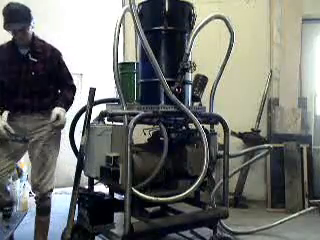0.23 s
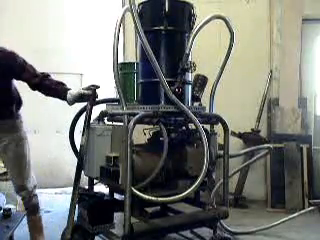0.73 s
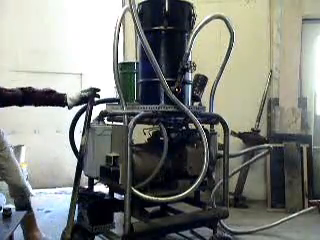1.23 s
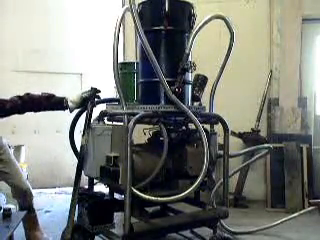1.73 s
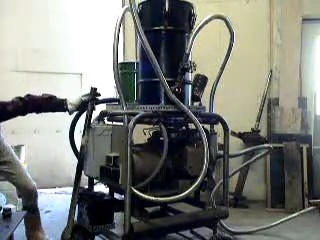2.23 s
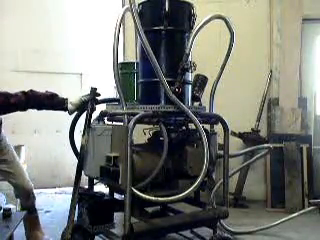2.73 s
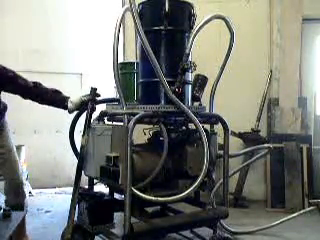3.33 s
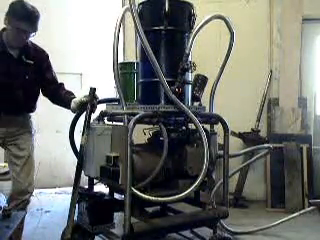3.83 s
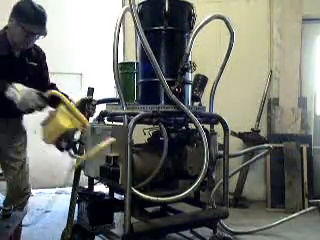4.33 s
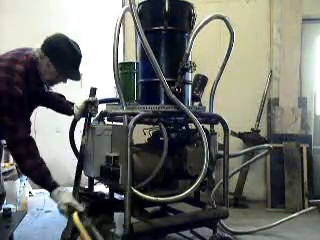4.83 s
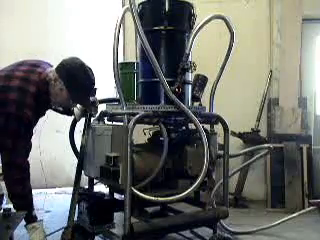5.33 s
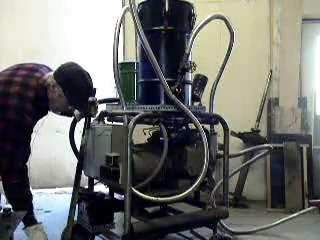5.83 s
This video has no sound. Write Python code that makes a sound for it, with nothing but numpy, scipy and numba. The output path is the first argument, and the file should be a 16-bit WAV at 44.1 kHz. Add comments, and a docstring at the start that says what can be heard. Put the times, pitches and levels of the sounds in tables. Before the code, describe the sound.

Close, dull camera sound with little treble: continuous engine drone and breathy roar, nearly constant in speed, its tones fluttering with the shed's echoes. Low wind gusts thump the microphone early, with one sharp pop and a heavy buffet. Later, light ticks lead to a loud short knock of a lamp housing, followed by scattered duller knocks, the motor still running to the end.

```python
"""Open shed: a small generator engine runs steadily a few metres from a cheap camera.
Wind: band-passed noise and single buffets. Lamp: knocks ring damped modes. Roar: noise bands
throbbing with the shaft. Hum: sines at shaft orders; order 60, a toothed part, whines.
The camera limits peaks, cuts the treble and leaves faint mirrored highs."""
import sys
import numpy as np
from scipy import signal
from scipy.fft import rfft, irfft
from scipy.io import wavfile
from scipy.ndimage import uniform_filter1d, map_coordinates
from numba import njit

SR = 44100
rng = np.random.default_rng(int(sys.argv[2]) if len(sys.argv) > 2 else 0)


def master_out(mix):
    """Clip the mix to full scale and print it as 16-bit PCM to the path in sys.argv[1]."""
    frames = np.transpose(np.atleast_2d(mix))
    ceiling = np.clip(frames, -1, 1)
    pcm = np.round(ceiling * 32767).astype(np.int16)
    wavfile.write(sys.argv[1], SR, pcm)


N = 267687
T = np.arange(N) / SR


def undb(db):
    """Decibels to amplitude gain."""
    return 10 ** (np.asarray(db) / 20)


def curves(table, t=T):
    """Table columns over time, joined by straight lines."""
    time_s, *columns = np.transpose(table)
    return [np.interp(t, time_s, column) for column in columns]


def walk(rate_hz, t=T):
    """Slow random drift, spread near 1; two knots per cycle of rate_hz."""
    white = rng.standard_normal(int(20 * rate_hz) + 8)
    knots = uniform_filter1d(white, size=2) * 1.7
    return np.interp(t * rate_hz * 2, np.arange(len(knots)), knots)


BREEZE_DB = -39  # steady floor under the gusts
# gusts on the microphone: (time [s], level at the height [dB], 1/e half-width [s])
GUSTS = [(.1, -28, 0.11), (0.246, -24, .07), (.52, -18.5, 0.063), (.9, -21, .1), (1.054, -38, .03),
         (1.18, -22, 0.035), (1.39, -7.5, 0.033), (1.6, -24, .05), (1.712, -18, 0.025),
         (1.788, -20.5, 0.045), (2.04, -27, 0.031), (2.19, -36, 0.05), (2.65, -22.5, 0.058),
         (2.946, -37, 0.11), (3.323, -26, 0.1), (3.69, -28, 0.053), (3.87, -28, .04), (4.296, -15, 0.057),
         (4.47, -23, 0.11), (5.455, -20.5, .04), (5.885, -24.5, 0.054)]
# single buffets: (time [s], peak [dB], 1/e half-width [s], push +1 or pull -1)
BUFFETS = [(.119, -10, .0022, -1), (.254, -10, .0013, -1), (.2595, -6, .0013, 1), (.309, 1, .001, 1),
           (.86, -15, .004, 1), (1.383, -12, .004, 1), (1.42, -7, .0025, -1), (1.426, -7, .0025, 1),
           (1.70, -13, .003, -1), (1.713, -13, .003, 1), (1.72, -10, .0015, -1), (1.785, -6, .0014, 1),
           (2.645, -14, .005, 1), (4.28, -14, .006, 1)]


def wind(low_hz=5.7, high_hz=69.0, flutter_db=-0.5, rebound=2.9):
    """Moving air rumbles at the microphone; sharp buffets push or pull its membrane."""
    band = signal.butter(2, [low_hz, high_hz], "band", fs=SR, output="sos")
    rumble = signal.sosfilt(band, rng.standard_normal(N))
    air = undb(BREEZE_DB)
    for time_s, db, width_s in GUSTS:
        air = air + undb(db) * np.exp(-((T - time_s) / width_s) ** 2)
    out = rumble / rumble.std() * air * undb(flutter_db * walk(24))
    for time_s, peak_db, width_s, sign in BUFFETS:
        u = (T - time_s) / width_s
        # spike on a wider opposite swing: the membrane returns to rest
        spike = np.exp(-u ** 2)
        swing_back = np.exp(-(u / rebound) ** 2) / rebound
        unit_peak = (spike - swing_back) * rebound / (rebound - 1)
        out = out + sign * undb(peak_db) * unit_peak
    return out


# lamp knocks: (time [s], peak [dB], lightness [0-1]); at 1 only the top mode rings
KNOCKS = [(4.359, -16, 1), (4.421, -12, 1), (4.484, -11, 1), (4.546, 3, 0), (4.606, -8, 0), (4.703, -7, 0),
          (4.865, -9, 0), (4.997, -8, 0), (5.396, -5, 0), (5.566, -9, 0)]
# housing modes: (frequency [Hz], level [dB], 60 dB decay time [s])
LAMP_MODES = [(750, 0, .03), (1150, 0, .03), (1700, -4, .02), (3350, -6, .025)]


def lamp():
    """Each knock rings the work lamp housing's damped modes, slightly detuned."""
    out, t = np.zeros(N), T[:SR // 10]
    detunes = rng.standard_normal((len(KNOCKS), len(LAMP_MODES)))
    for (time_s, peak_db, lightness), detune in zip(KNOCKS, detunes):
        rings = []
        for (hz, mode_db, t60_s), d in zip(LAMP_MODES, detune):
            tone = np.sin(2 * np.pi * hz * (1 + 0.022 * d) * t)
            rings.append(undb(mode_db) * tone * 1000 ** (-t / t60_s))
        ring = rings[-1] + (1 - lightness) * sum(rings[:-1])
        start = int(time_s * SR)
        out[start:start + len(t)] += undb(peak_db) * ring / np.abs(ring).max()
    return out


TEETH = 60
# shaft speed as tooth rate: (time [s], teeth passing per second [Hz])
TOOTH_RATE = [(0.0, 1883.0), (0.7, 1889.5), (1.0, 1882.0), (1.25, 1886.0), (1.6, 1881.5), (2.25, 1889.0),
              (2.5, 1885.5), (3.0, 1888.5), (3.5, 1896.0), (3.8, 1893.0), (4.75, 1894.0), (5.5, 1901.5),
              (5.75, 1898.5), (6.0, 1892.5)]


def shaft_angle():
    """Shaft angle [rad]: running sum of the turning rate."""
    return 2 * np.pi * np.cumsum(curves(TOOTH_RATE)[0]) / TEETH / SR


# base spectrum of exhaust, fan and casing: (frequency [Hz], density [dB per Hz])
ROAR = [(30, -69), (90, -61.5), (160, -59.5), (250, -51), (400, -50.5), (580, -48), (800, -48.5),
        (1100, -51.5), (1500, -52), (1900, -52.5), (2150, -56), (3000, -59.5), (3800, -60), (4600, -61.5)]


def roar_db(hz):
    """Base roar density at hz, straight lines over log frequency."""
    table_hz, density_db = np.transpose(ROAR)
    return np.interp(np.log(hz), np.log(table_hz), density_db)


# roar level by band centre: (time [s], boom < 300 Hz [dB], middle [dB], hiss >= 1200 Hz [dB])
LOAD = [(0, -3, 0, -3), (.6, 4.5, 3.2, -1.2), (1, 0.5, 0, -0.5), (1.5, 0.3, 0.8, -1), (3, -4.5, -3, -3),
        (4.3, -0.3, 0, -1.7), (5, 5.5, 2.5, 2), (6.07, 7.5, 4.6, 2.4)]


def roar(angle, swell_db=0.5, flicker_db=1.0, throb=0.18, low_throb=.04):
    """Noise bands half an octave apart, pulsed by firing and fan, most in the treble."""
    hz = np.fft.rfftfreq(N + 1, 1 / SR) + 1  # +1 keeps log(hz) finite
    boom_db, middle_db, hiss_db = curves(LOAD)
    beat = 0.41 * np.cos(angle / 2) + 0.68 * np.cos(angle + 1) + 0.66 * np.cos(2 * angle)
    beat = beat + 0.54 * np.cos(3 * angle) + .5 * np.cos(4 * angle + 2)
    swell, out = walk(9), 0
    for centre_hz in 32 * 2 ** np.arange(0, 7.6, .5):
        # neighbouring shares add to constant power
        share = np.cos(np.pi * np.clip(np.log2(hz / centre_hz), -.5, .5))
        spectrum = rfft(rng.standard_normal(N + 1)) * share * undb(roar_db(hz))
        band = irfft(spectrum, N + 1)[:N] * np.sqrt(SR / 2)
        depth = low_throb + throb * (centre_hz / 4000) ** 1.5
        load_db = boom_db if centre_hz < 300 else middle_db if centre_hz < 1200 else hiss_db
        db = load_db + swell_db * swell + flicker_db * walk(14)
        out = out + band * undb(db) * (1 + depth * beat)
    return out


# prominent orders [multiples of shaft rate]
CLEAR_ORDERS = [2, 4, 5.5, 8, 10, 11.5, 13, 16, 17, 18, 19, 28, 30, 32, 40, 44, 48, 52, 53, 56, 59, 61]
# usual levels of those orders [dB]
CLEAR_DB = [-40, -46, -41, -38, -36.5, -34.5, -37.5, -31.5, -34, -28, -29.5, -30.5, -33.5, -31.5, -39.5,
            -36.5, -36, -35.5, -39, -36.5, -33.5, -35.5]
# other orders, dB over roar density: every fourth, even, odd, half
FOURTH_DB, EVEN_DB, ODD_DB, HALF_DB = 5.5, 9, 9, 8.5
# strongest hum lines: (time [s], order 12 [dB], order 20 [dB], order 24 [dB])
DRONE = [(0, -28.5, -24, -23.5), (.45, -25.5, -21.5, -30), (.85, -23, -18.5, -46), (1.1, -22.5, -30.5, -22),
         (1.6, -29, -21, -33), (2.05, -29.5, -24.5, -31), (2.3, -33, -18.5, -35), (2.8, -29, -24, -36),
         (3.05, -25, -22, -27), (3.35, -32, -28, -22), (3.6, -24.5, -22.5, -26), (3.9, -26.5, -19.5, -32),
         (4.4, -25.5, -19, -26), (4.68, -24.5, -31, -21.5), (5.1, -23, -22.5, -28.5),
         (6.07, -20.5, -28, -24)]
# whine at the tooth rate: (time [s], level [dB])
WHINE = [(0, -31), (.4, -23), (.46, -34), (.53, -15.5), (.68, -15), (.84, -26.5), (.98, -10.5), (1.06, -30),
         (1.12, -14.5), (1.28, -33), (1.4, -20.5), (1.5, -18.5), (1.6, -33), (1.74, -34), (1.84, -20.5),
         (2.21, -20), (2.3, -30), (2.64, -31.5), (2.75, -20), (2.9, -25.5), (3.2, -40), (3.32, -18),
         (3.52, -19), (3.6, -23.5), (4.24, -32), (4.33, -20), (4.53, -16.5), (4.58, -33), (4.75, -20.5),
         (5.05, -29), (5.2, -20.5), (5.95, -21), (6.07, -33)]
# octave of the whine: (time [s], level [dB])
OCTAVE = [(0, -50), (.95, -46), (1.12, -31), (1.4, -41), (2.15, -31.5), (2.45, -36), (3.1, -33.5),
          (3.7, -34), (3.97, -50), (4.3, -38), (4.8, -37), (5.0, -34.5), (5.3, -35), (6.07, -35)]
# common swell of orders 28, 30, 32, about 900-1000 Hz: (time [s], over usual level [dB])
UPPER = [(0, -2), (.5, 3), (1.0, 0), (1.35, -8), (1.6, 3.5), (2.05, -1.5), (2.5, 4), (2.95, 2), (3.3, -5),
         (3.65, -3), (3.9, 3), (4.4, -1.5), (5.05, 2), (5.6, -5), (5.9, 5), (6.07, 2)]
DRONE_FADE_DB, WHINE_FADE_DB, OCTAVE_FADE_DB = 1.7, 1, 3  # random fade spread


def hum(angle, fade_db=3.5, fade_rate_hz=9., waver_rad=0.39, waver_rad_per_order=0.0058):
    """Sines at multiples of the shaft rate; each fades and wavers alone as the shed's echoes shift."""
    t, angle = T[::4], angle[::4]  # quarter rate suffices for these orders
    steady_db = dict(zip(CLEAR_ORDERS, CLEAR_DB))
    led_curves = curves(DRONE, t) + curves(WHINE, t) + curves(OCTAVE, t)
    led_db = dict(zip([12, 20, 24, TEETH, 2 * TEETH], led_curves))
    upper_db = curves(UPPER, t)[0]
    led_db.update({order: steady_db[order] + upper_db for order in (28, 30, 32)})
    start_hz = TOOTH_RATE[0][1] / TEETH
    out = 0
    for order in [*np.arange(2, 40, .5), *range(40, 125)]:
        fade = walk(fade_rate_hz, t)
        if order in led_db:
            spread_db = (DRONE_FADE_DB if order < TEETH
                         else WHINE_FADE_DB if order == TEETH else OCTAVE_FADE_DB)
            db = led_db[order] + spread_db * fade
        else:
            over_db = (HALF_DB if order % 1 else ODD_DB if order % 2
                       else EVEN_DB if order % 4 else FOURTH_DB)
            db = steady_db.get(order, roar_db(order * start_hz) + over_db) + fade_db * fade
        phase = order * angle + 2 * np.pi * rng.random()
        phase = phase + (waver_rad + waver_rad_per_order * order) * walk(6, t)
        out = out + undb(db) * np.sqrt(2) * np.sin(phase)
    return signal.resample_poly(out, 4, 1)[:N]


def scene():
    """Engine, wind and lamp in one channel."""
    angle = shaft_angle()
    engine = undb(1.06) * (hum(angle) + roar(angle))
    return (engine + wind() + lamp())[None]


@njit
def limiter(x, top, release_per_sample):
    """Gain drops at once on a peak over the top, then creeps back."""
    y, envelope = np.empty(len(x)), top
    for i in range(len(x)):
        envelope = max(abs(x[i]), envelope + (top - envelope) * release_per_sample)
        y[i] = x[i] * top / envelope
    return y


LIMIT, RELEASE_S = .8, .13
CAMERA_HZ, HELD_RATE_HZ, TOP_HZ = 4480, 32000, 12600


def record(dry):
    """Camera: limiter, low-pass, nearest-sample hold at a lower rate (mirrors faint highs), low-pass."""
    x = limiter(dry[0], LIMIT, 1 / (RELEASE_S * SR))
    x = signal.sosfilt(signal.cheby1(14, .5, CAMERA_HZ, fs=SR, output="sos"), x)
    held_index = np.round(T * HELD_RATE_HZ) * SR / HELD_RATE_HZ
    x = map_coordinates(x, [held_index], order=3, mode="nearest")
    return signal.sosfilt(signal.ellip(16, .2, 70, TOP_HZ, fs=SR, output="sos"), x)[None]


dry = scene()
out = record(dry)
master_out(out)
```